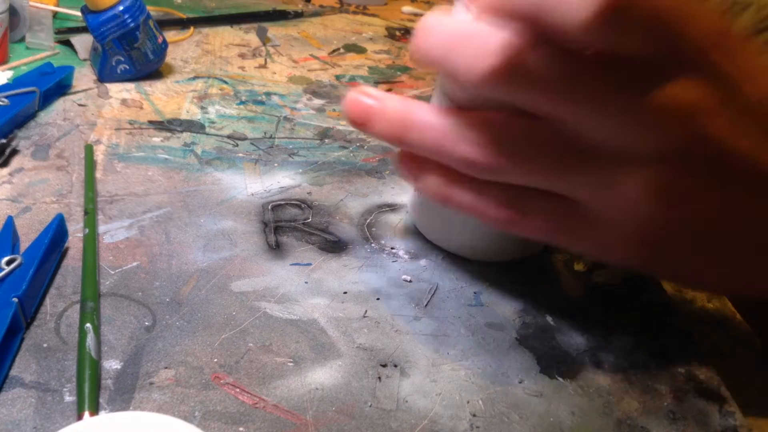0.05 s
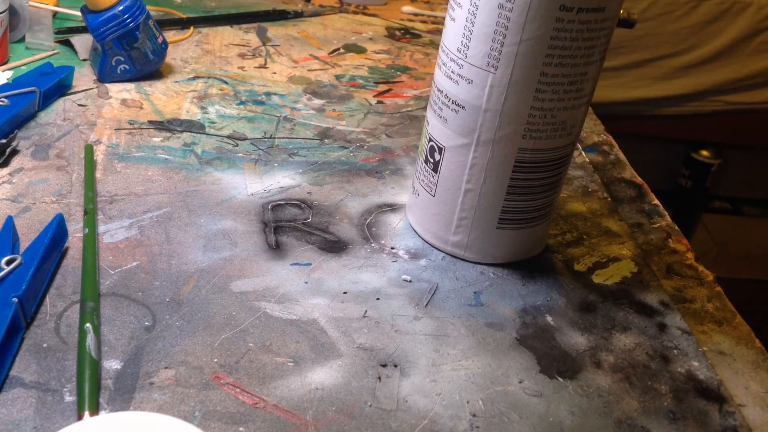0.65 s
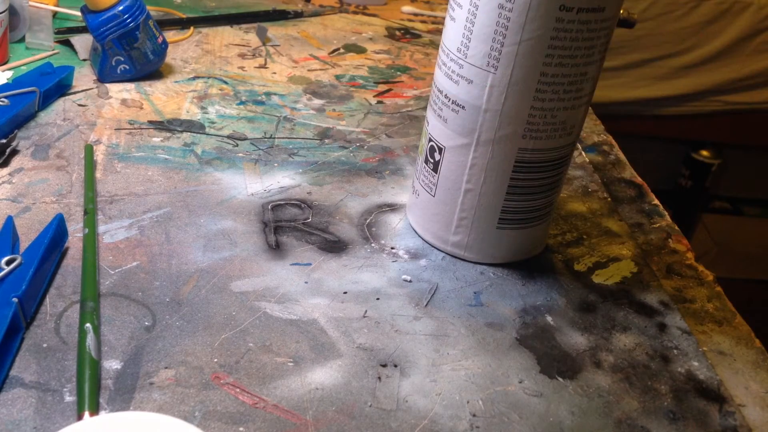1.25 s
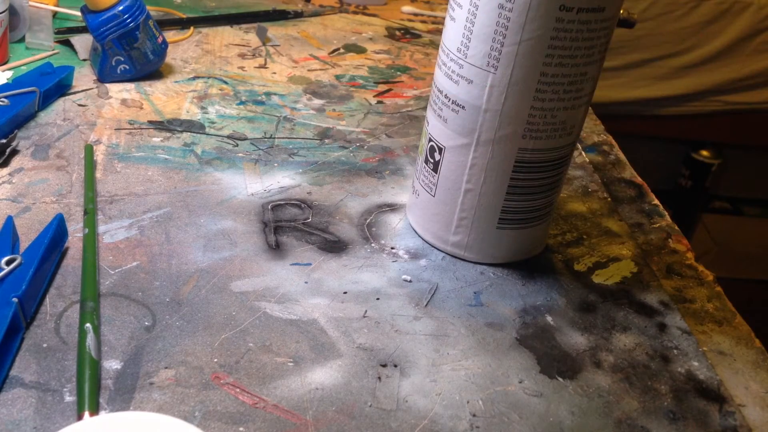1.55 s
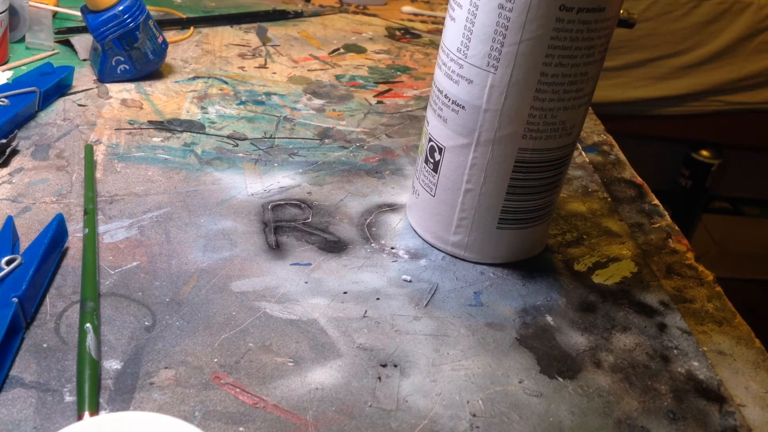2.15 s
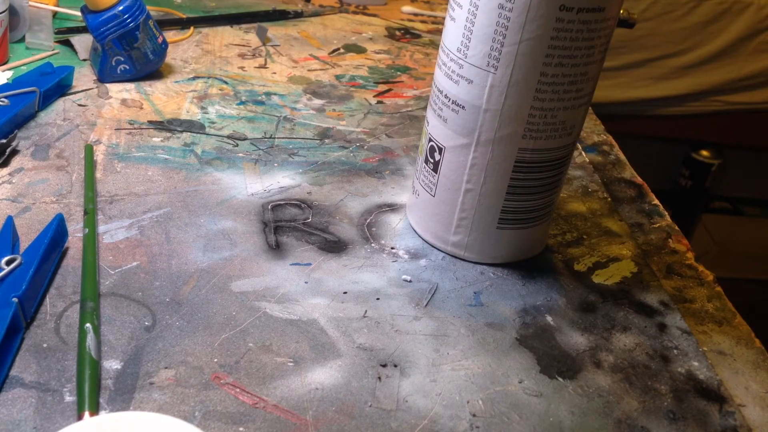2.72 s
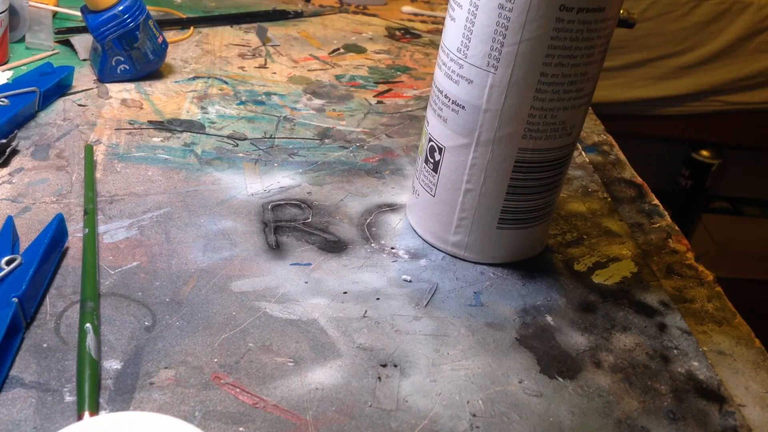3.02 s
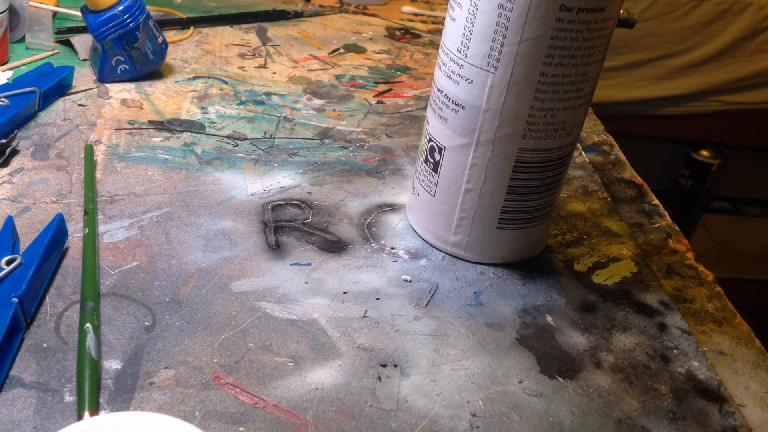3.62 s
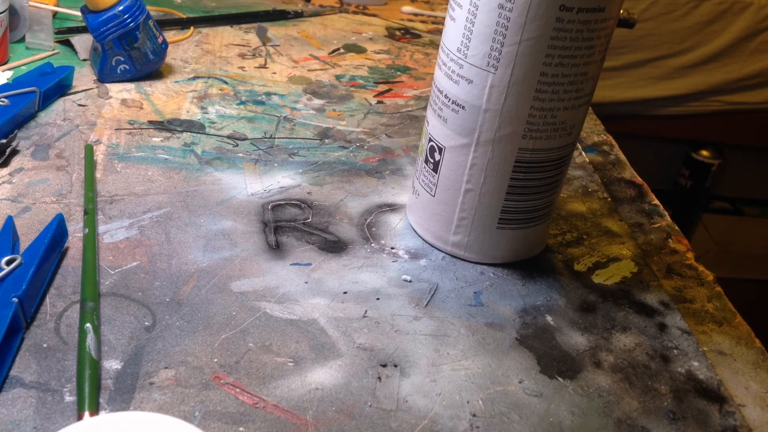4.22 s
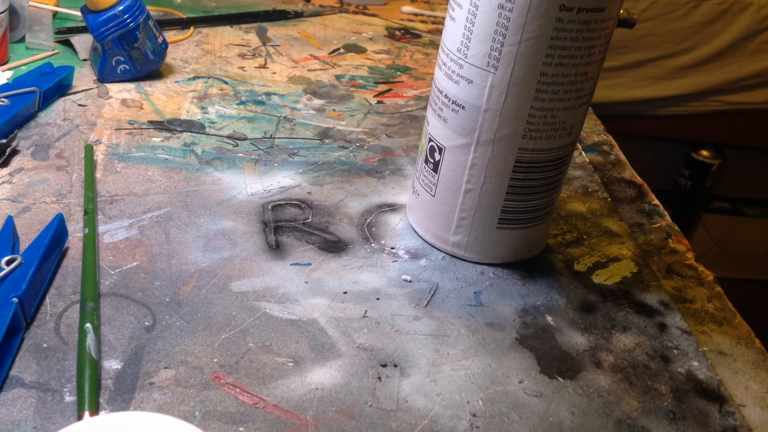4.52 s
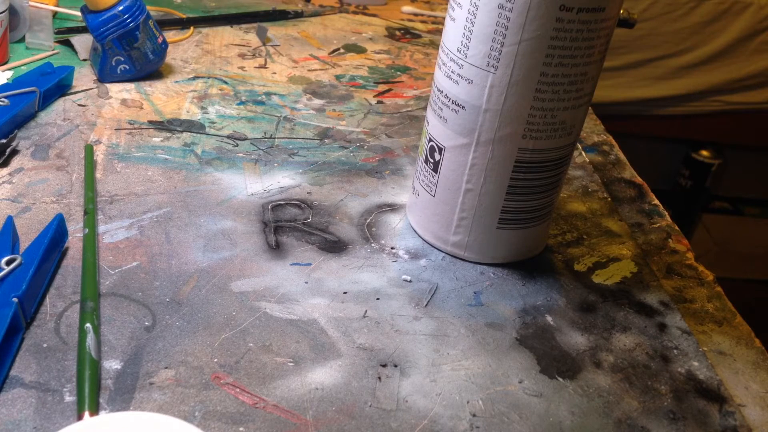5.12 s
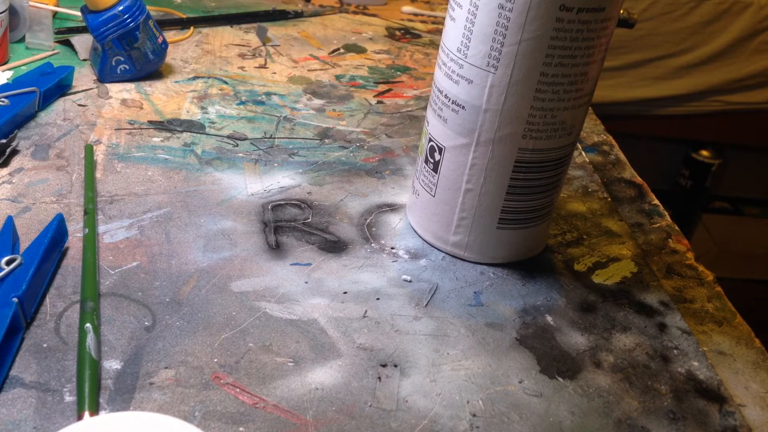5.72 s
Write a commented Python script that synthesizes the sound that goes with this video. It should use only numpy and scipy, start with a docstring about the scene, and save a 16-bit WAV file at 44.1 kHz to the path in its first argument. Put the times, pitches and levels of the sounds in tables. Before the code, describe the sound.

A can knocks down on a wooden workbench, then a knife tip lightly taps and scrapes a small hollow tub in a quiet room.

```python
"""A can knocks down on a wooden workbench in a small quiet room: it lands on its edge, drops flat and
rocks to rest with a gritty scrape. Then a knife tip taps, ticks and scrapes lightly on a small hollow
tub, with faint rubbing in the long pauses and a faint, short swell of noise around the louder taps.
Blows ring the bench, can, tub and blade; scrapes are streams of tiny slips.
Under it lie a low room rumble and the hiss and thin whine of microphone electronics."""
import sys
import numpy as np
from scipy import signal
from scipy.fft import rfft, irfft, next_fast_len
from scipy.io import wavfile
from scipy.ndimage import map_coordinates

SR = 44100
rng = np.random.default_rng(int(sys.argv[2]) if len(sys.argv) > 2 else 0)


def transcribe(signal):
    """Save signal, clipped to [-1, 1], as a 16-bit WAV file at the path in sys.argv[1]."""
    frames = np.atleast_2d(signal).T
    limited = np.clip(frames, -1, 1)
    pcm = np.round(limited * 32767).astype(np.int16)
    wavfile.write(sys.argv[1], SR, pcm)


N = 254501
IR_SAMPLES = 32768
IR_HZ = np.fft.rfftfreq(IR_SAMPLES, 1 / SR)
AGE_S = np.arange(IR_SAMPLES) / SR
TIME_S = np.arange(N) / SR

# Spectra of bench top, tub wall and hard contact. Each row: frequency in Hz, level in dB.
BENCH_SPECTRUM = [(20, -30.5), (60, -0.5), (300, 1), (1200, 1), (1950, -0.5), (2700, -3), (4200, -5.5),
                  (16000, -28)]
TUB_SPECTRUM = [(100, -11), (280, 4), (400, 5), (1500, 3.5), (2200, 1.5), (2750, -10.5), (3400, -3),
                (5000, -10), (16000, -77)]
TICK_SPECTRUM = [(500, -34.5), (2500, -1), (4500, -2.5), (6300, -6.5), (8000, -13), (11000, -15.5),
                 (16000, -6.5)]
# Body resonances. Each row: frequency in Hz, width in Hz, lift in dB.
BENCH_RESONANCES = [(109.1, 51, 14.8), (178, 21, 8.3), (339.6, 27, 9.9), (420, 62, 5.2), (530, 41, 8.7),
                    (632, 37, 2.1), (732, 80, 5), (1164, 82, 1.92)]
TUB_RESONANCES = [(337, 19, 18.3), (454, 56, 13.5), (675, 45, 11.9), (754, 67, 9.4), (879, 94, 8.6),
                  (1088.6, 25, 12.5), (1210, 79, 6.4), (1410, 24, 5.4), (1548, 50, 7.5), (1815, 120, 11.2),
                  (2124, 150, 7.1)]
# Slow sway of the bench. Each row: frequency in Hz, level in dB, T60 in seconds.
SWAY_MODES = [(50.3, -5, 0.27), (111, 1.5, 0.05), (192.1, -2, 0.1), (175, -21.5, 2.0)]


def can_landing(graze_lead_s=0.008, rim_lead_s=0.00092, rebound_sharpening=1.28):
    """The can grazes the bench, lands on its edge, drops flat; each landing clacks and rebounds."""
    # Each row: start in seconds, level in dB, blow centre in Hz, rebound delay in seconds,
    # rebound and rim clack in dB re the level.
    landings = [(0.1012, -16.5, 282.5, 0.0029, 3, -28.5), (0.1175, -18.5, 774, 0.0053, -9, -12.5)]
    out = np.zeros(N)
    add(out, landings[0][0] - graze_lead_s, amp(-40) * can_blow(centre_hz=220))
    for start_s, db, centre_hz, rebound_s, rebound_db, rim_db in landings:
        clack = struck(BENCH_SPECTRUM, BENCH_RESONANCES, centre_hz=2500, octaves=0.17)
        add(out, start_s - rim_lead_s, amp(db + rim_db) * clack + amp(-38) * tick())
        add(out, start_s, amp(db) * can_blow(centre_hz))
        add(out, start_s + rebound_s, amp(db + rebound_db) * can_blow(centre_hz * rebound_sharpening))
    return in_room(out, wet_db=-15.5)


def can_blow(centre_hz):
    """One contact thumps and sways the bench; a harder, higher blow is narrower and rings the can more."""
    # Each row: frequency in Hz, level in dB, T60 in seconds.
    can_modes = [(360.5, -24.5, 0.094), (495, -19, 0.22), (610, -20.5, 0.095), (738, -15, 0.041),
                 (880, -6, 0.06), (925, -23.5, 0.3), (1026, -25, 0.06), (1185, -7, 0.095),
                 (1226, -4, 0.025), (1470, -15, 0.074), (1724, -18.5, 0.26), (1760, -18.5, 0.1),
                 (1870, -19, 0.13), (2553, -7, 0.07), (2900, -10.5, 0.08), (3010, -13, 0.03)]
    # Each row: blow centre in Hz, blow width in octaves.
    width_octaves = [(200, 1), (290, 1), (380, 0.77), (1000, 0.39)]
    # Each row: blow centre in Hz, gain in dB.
    ring_db = [(380, -50.5), (800, -16)]
    sway_db = [(200, -30), (300, -24), (800, -26.5)]
    thump = struck(BENCH_SPECTRUM, BENCH_RESONANCES, centre_hz, along(width_octaves, centre_hz))
    ring = amp(along(ring_db, centre_hz)) * ringing(can_modes)
    sway = amp(along(sway_db, centre_hz)) * ringing(SWAY_MODES)
    return thump + ring + sway


def can_settling(roll_db=-57, roll_at_s=0.209, roll_sigma_s=0.012):
    """The can bumps, rolls on its rim and rocks to rest."""
    # Each row: start in seconds, level in dB, blow centre in Hz, tick in dB re the level.
    bumps = [(0.1302, -40, 620, -38), (0.1464, -41.5, 240, -28), (0.2142, -42.5, 255, -26),
             (0.27, -56, 400, -12), (0.299, -57, 280, -18)]
    out = np.zeros(N)
    for start_s, db, centre_hz, tick_db in bumps:
        add(out, start_s, amp(db) * (can_blow(centre_hz) + amp(tick_db) * tick()))
    bench = struck(BENCH_SPECTRUM, BENCH_RESONANCES, centre_hz=200, octaves=2.2)
    roll = unit_rms(signal.fftconvolve(rng.standard_normal(N), bench)[:N])
    swell = np.exp(-.5 * ((TIME_S - roll_at_s) / roll_sigma_s) ** 2)
    return in_room(out + amp(roll_db) * swell * roll, wet_db=-12.5)


def rim_grit(drag_db=-61.5, catch_t60_s=0.016):
    """The rim drags over dried paint on the bench, crackling and catching with small ticks."""
    # Each row: frequency in Hz, level in dB.
    grit_spectrum = [(1000, -22), (3500, -4.5), (5800, -5), (7200, -6.5), (8600, -12.5), (11000, -8.5),
                     (13000, -9), (15500, -7)]
    # Each row: start in seconds, peak in dB.
    catches = [(0.0942, -50.5), (0.1025, -38), (0.1102, -44), (0.158, -51.5), (0.176, -51.5),
               (0.187, -55.5), (0.2135, -47.5)]
    grains = unit_rms(grainy(impulse(along(grit_spectrum, IR_HZ)), grains_per_s=4000))
    pressure = envelope(start_s=0.148, hold_s=0.036, fade_s=0.034, wobble_db=2.0, wobbles_per_s=200)
    out = amp(drag_db) * pressure * grains
    for start_s, db in catches:
        add(out, start_s, amp(db) * tick(grit_spectrum, catch_t60_s))
    return out


def knife_taps(sway_db=-44, loss_db=2, dulling=0.9, slowing=1.05):
    """Hollow knocks on the tub with a steely tick on top; some taps chatter, all nudge the bench."""
    # Each row: start in seconds, level in dB, blow centre in Hz, width in octaves, tick in dB re the
    # level, tick centre in Hz, contact count, first gap in seconds, room send in dB.
    taps = [(0.427, -52, 930, 0.47, -29, 4700, 1, 0, -5.5), (1.1280, -48.5, 1420, 1.3, -11, 4680, 1, 0, -5),
            (1.393, -47.5, 580, 1.1, -21, 4600, 3, 0.005, 0),
            (1.442, -49.5, 620, 1.1, -19, 4600, 1, 0, -5.5),
            (1.5111, -44, 1980, 0.46, -15, 4630, 2, 0.004, -6.5),
            (2.9462, -23, 1200, 0.56, -24, 3430, 4, 0.0026, -9),
            (2.9627, -41, 1210, 0.31, -12, 5200, 1, 0, -15),
            (3.6350, -47, 1970, 0.89, -20, 4560, 3, 0.0013, -7.5),
            (3.7188, -49, 2080, 0.88, -6.5, 4750, 3, 0.0019, -4),
            (4.3868, -36.5, 1630, 0.55, -6, 6200, 1, 0, -7.5),
            (4.3978, -37, 1470, 0.53, -8, 6160, 1, 0, -9),
            (4.4115, -57.5, 1620, 0.5, 0, 6260, 2, 0.0025, -6),
            (5.1881, -32, 946, 0.38, -23.5, 4600, 1, 0, -10.5),
            (5.469, -42, 850, 0.69, -28, 4570, 2, 0.0085, -5)]
    out = np.zeros(N)
    for start_s, db, centre_hz, octaves, tick_db, tick_hz, contacts, gap_s, room_db in taps:
        add(out, start_s, amp(db + sway_db) * ringing(SWAY_MODES))
        for k in range(contacts):  # chatter: weaker, duller, ever longer flights
            hz = centre_hz * dulling ** k
            knock = dispersed(struck(TUB_SPECTRUM, TUB_RESONANCES, hz, octaves), hz)
            contact = in_room(knock + amp(tick_db) * blade(tick_hz), room_db)
            delay_s = gap_s * np.sum(slowing ** np.arange(k))
            add(out, start_s + delay_s, amp(db - k * loss_db) * contact)
    return out


def blade(tick_hz, octaves=0.16, attack_s=0.000064):
    """The steel tip clicks and briefly rings, most in the modes near tick_hz."""
    # Each row: frequency in Hz, level in dB, T60 in seconds.
    tip_modes = [(3270, -0.5, 0.009), (4930, -6, 0.0091), (6150, -9, 0.017)]
    excited = [(hz, db + 20 * np.log10(bell(hz, tick_hz, octaves) + 1e-9), t60_s)
               for hz, db, t60_s in tip_modes]
    return (tick(t60_s=0.0087) + ringing(excited)) * (1 - np.exp(-AGE_S / attack_s))


def scrapes_and_swells(sustain=1.64):
    """Knife scrapes build up the tub's resonances; faint, short noise swells surround the louder taps."""
    # Each row: start, hold and fade-in in seconds, level in dB, centre in Hz, width in octaves.
    # The rows at 2.932, 4.38 and 5.187 s are the swells; the rest are scrapes.
    bursts = [(1.133, 0.12, 0.016, -67, 1290, 1.1), (1.52, 0.023, 0.02, -54.5, 1440, 0.84),
              (2.03, 0.15, 0.067, -70, 900, 0.57), (2.111, 0.021, 0.028, -56.5, 776, 0.63),
              (2.932, 0.029, 0.018, -63, 1100, 0.6), (2.972, 0.014, 0.01, -51, 1050, 0.96),
              (3.003, 0.051, 0.027, -48.5, 1003, 0.34), (3.054, 0.011, 0.012, -59, 660, 0.44),
              (3.424, 0.09, 0.063, -73.5, 937, 0.13), (4.38, 0.0022, 0.0022, -54.5, 1490, 0.68),
              (4.402, 0.002, 0.006, -52.5, 1500, 0.34), (5.187, 0.01, 0.0066, -63.5, 1090, 0.38)]
    # A higher burst hisses more. Each row: centre in Hz, hiss in dB re the burst.
    hiss_db = [(950, -28), (1400, -15.5)]
    resonances = [(hz, width_hz / sustain, db * sustain) for hz, width_hz, db in TUB_RESONANCES]
    out = np.zeros(N)
    for start_s, hold_s, fade_s, db, centre_hz, octaves in bursts:
        tub = struck(TUB_SPECTRUM, resonances, centre_hz, octaves)
        body = unit_rms(grainy(tub, grains_per_s=5000))
        contour = envelope(start_s, hold_s, fade_s)
        hiss = amp(along(hiss_db, centre_hz)) * noise(TICK_SPECTRUM)
        out += amp(db) * contour * (body + hiss)
    return out


def tub_rubs():
    """Light rubbing: faint, sparse scratches in the narrow resonances of the tub's wall."""
    # Each row: start, hold and fade-in in seconds, level in dB, centre in Hz, width in octaves.
    rubs = [(0.517, 0.3, 0.041, -72, 1700, 0.83), (0.548, 0.018, 0.007, -64.5, 1750, 0.84),
            (0.679, 0.016, 0.0038, -65.5, 1830, 0.36), (0.743, 0.04, 0.008, -68, 1765, 0.51),
            (0.85, 0.24, 0.045, -74, 1300, 0.77), (3.069, 0.047, 0.02, -69, 1630, 0.66),
            (4.076, 0.19, 0.05, -75.5, 1350, 0.85), (4.688, 0.07, 0.025, -78, 2200, 1.1)]
    # Each row: frequency in Hz, width in Hz, lift in dB.
    wall_resonances = [(1210, 91, 15), (1440, 110, 11.5), (1815, 51, 18.5), (2325, 43, 13), (2970, 80, 15)]
    out = np.zeros(N)
    for start_s, hold_s, fade_s, db, centre_hz, octaves in rubs:
        rustle = grainy(struck(TUB_SPECTRUM, wall_resonances, centre_hz, octaves), grains_per_s=600)
        pressure = envelope(start_s, hold_s, fade_s, wobble_db=0)
        out += amp(db) * pressure * unit_rms(in_room(rustle, wet_db=-2))
    return out


def struck(spectrum, resonances, centre_hz, octaves, floor_db=-38):
    """A body's response to one contact, peak 1; a harder contact feeds a higher band."""
    band = bell(IR_HZ + 1, centre_hz, octaves) + amp(floor_db)
    lift = 1 + sum((amp(db) ** 2 - 1) / (1 + (2 * (IR_HZ - hz) / width_hz) ** 2)
                   for hz, width_hz, db in resonances)
    gain_db = along(spectrum, IR_HZ) + 20 * np.log10(band) + 10 * np.log10(np.abs(lift))
    return unit_peak(impulse(gain_db))


def ringing(modes, scatter_db=2.0):
    """Damped sines whose strengths vary from blow to blow."""
    return sum(amp(db + rng.normal(0, scatter_db) - 60 * AGE_S / t60_s) * np.sin(2 * np.pi * hz * AGE_S)
               for hz, db, t60_s in modes)


def tick(spectrum=TICK_SPECTRUM, t60_s=0.028):
    """Short bright crackle of two hard surfaces meeting."""
    return unit_peak(noise(spectrum)[:IR_SAMPLES] * amp(-60 * AGE_S / t60_s))


def dispersed(x, hz, q=1.0):
    """All-pass: bending waves near hz arrive late, so a blow swells over its first cycles."""
    pole = np.exp(-np.pi * hz / (q * SR))
    a = [1, -2 * pole * np.cos(2 * np.pi * hz / SR), pole ** 2]
    return signal.lfilter(a[::-1], a, x)


def grainy(response, grains_per_s):
    """Tiny pulses of random size and timing excite an impulse response."""
    pulses = (rng.random(N) < grains_per_s / SR) * rng.standard_normal(N)
    return signal.fftconvolve(pulses, response)[:N]


def envelope(start_s, hold_s, fade_s, wobble_db=1.8, wobbles_per_s=90, release_ratio=0.61):
    """The level builds, holds and falls a little faster, wavering by wobble_db."""
    before_s = np.maximum(start_s - TIME_S, 0)
    after_s = np.maximum(TIME_S - start_s - hold_s, 0)
    wobble = map_coordinates(rng.standard_normal(4096), [TIME_S * wobbles_per_s], mode="wrap")
    return np.exp(-(before_s + after_s / release_ratio) / fade_s) * amp(wobble_db * wobble)


def in_room(x, wet_db, onset_s=0.0012):
    """A sound plus its short, diffuse reflections from bench clutter and walls."""
    # Each row: frequency in Hz, T60 in seconds.
    room_t60_s = [(100, 0.24), (400, 0.093), (1200, 0.12), (4000, 0.16), (12000, 0.013)]
    hz, age_s, bins = signal.stft(rng.standard_normal(IR_SAMPLES), SR, nperseg=256)
    decay = amp(-60 * age_s / along(room_t60_s, hz)[:, None])
    tail = signal.istft(bins * decay, SR, nperseg=256)[1][:IR_SAMPLES]
    tail *= 1 - np.exp(-(AGE_S / onset_s) ** 2)
    return x + amp(wet_db) * signal.fftconvolve(x, tail / np.linalg.norm(tail))[:len(x)]


def background(rumble_db=-69.5, hiss_db=-67.0, whine_gain_db=-1, drift_step_rad=0.012):
    """Room rumble, with the hiss and slightly unsteady whine of the electronics."""
    # Each row: frequency in Hz, relative level in dB.
    rumble_spectrum = [(18, -27), (35, -13), (55, -3), (120, -3), (220, -3.5), (380, -5), (600, -10.5),
                       (1000, -12), (2000, -16), (4000, -22.5), (9000, -56.5)]
    hiss_spectrum = [(1000, -29.5), (2800, -13), (4500, -11.5), (7000, -7), (8500, -13.5), (10500, -7.5),
                     (12500, -12), (14000, -3.5), (15200, -0.5)]
    whine_tones = [(3677, -96.5), (4430, -92), (5163, -92), (5895, -91.5), (6621, -89), (7354, -88.5),
                   (7375, -89.5), (14879, -98.5)]
    whine = np.zeros(N)
    for hz, db in whine_tones:
        drift_rad = drift_step_rad * np.cumsum(rng.standard_normal(N))
        whine += amp(db + whine_gain_db) * np.sqrt(2) * np.sin(2 * np.pi * hz * TIME_S + drift_rad)
    return amp(rumble_db) * noise(rumble_spectrum) + amp(hiss_db) * noise(hiss_spectrum) + whine


def noise(spectrum):
    """Steady coloured noise of rms 1."""
    size = next_fast_len(N)
    gain = amp(along(spectrum, np.fft.rfftfreq(size, 1 / SR)))
    return unit_rms(irfft(rfft(rng.standard_normal(size)) * gain, size)[:N])


def impulse(gain_db):
    """Minimum-phase impulse response with this gain over IR_HZ."""
    cepstrum = irfft(np.log(np.maximum(amp(gain_db), 1e-6)))
    cepstrum[1:IR_SAMPLES // 2] *= 2
    cepstrum[IR_SAMPLES // 2 + 1:] = 0
    return irfft(np.exp(rfft(cepstrum)))


def bell(hz, centre_hz, octaves):
    """Gaussian band on an octave axis."""
    return np.exp(-.5 * (np.log2(hz / centre_hz) / octaves) ** 2)


def along(points, hz):
    """Interpolate (Hz, value) points on a log axis."""
    points_hz, values = np.transpose(points)
    return np.interp(np.log(hz + 1), np.log(points_hz), values)


def amp(db):
    """Decibels to gain."""
    return 10 ** (np.asarray(db) / 20)


def unit_rms(x):
    """Scale to rms 1."""
    return x / np.sqrt(np.mean(x ** 2) + 1e-20)


def unit_peak(x):
    """Scale to peak 1."""
    return x / np.max(np.abs(x))


def add(track, start_s, sound):
    """Mix a sound into the track."""
    part = track[round(start_s * SR):][:len(sound)]
    part += sound[:len(part)]


def scene():
    """Everything reaches one close microphone."""
    can = can_landing() + can_settling() + rim_grit()
    return (can + knife_taps() + scrapes_and_swells() + tub_rubs() + background())[None]


def record(dry, low_cut_hz=36, top_hz=15350):
    """Roll off the deepest bass and cut everything above top_hz."""
    dry = signal.sosfilt(signal.butter(2, low_cut_hz, "highpass", fs=SR, output="sos"), dry)
    size = next_fast_len(N + IR_SAMPLES)
    passband = np.fft.rfftfreq(size, 1 / SR) < top_hz
    return irfft(rfft(dry, size) * passband, size)[:, :N]


dry = scene()
out = record(dry)
transcribe(out)
```